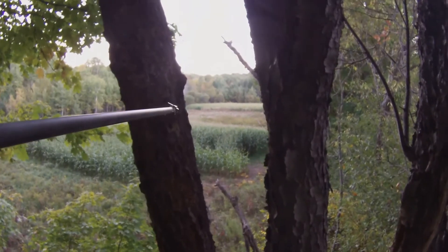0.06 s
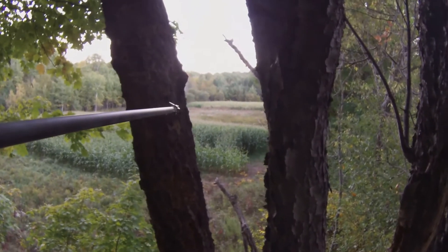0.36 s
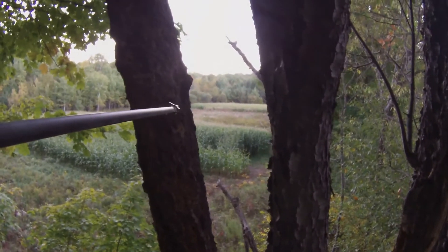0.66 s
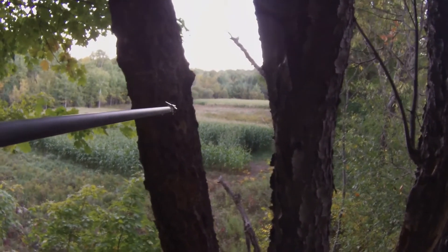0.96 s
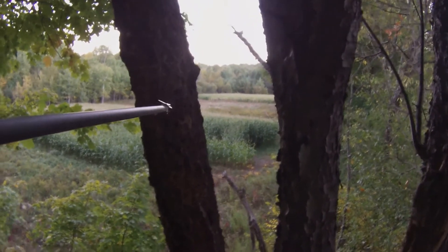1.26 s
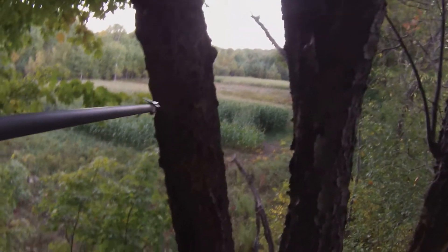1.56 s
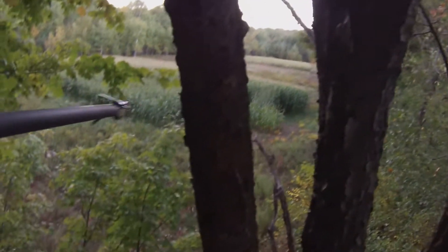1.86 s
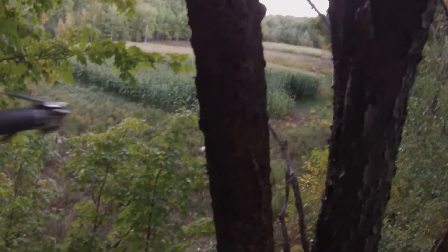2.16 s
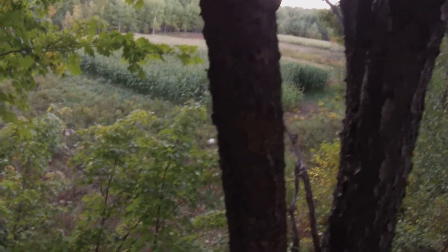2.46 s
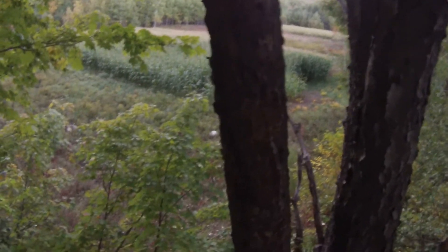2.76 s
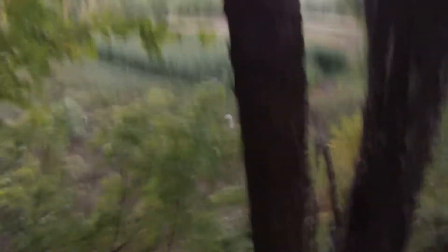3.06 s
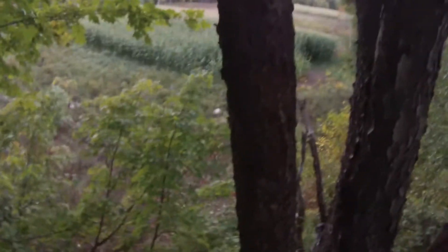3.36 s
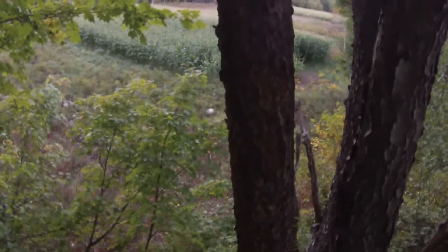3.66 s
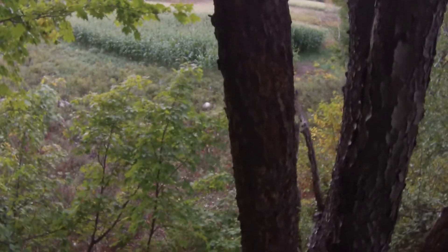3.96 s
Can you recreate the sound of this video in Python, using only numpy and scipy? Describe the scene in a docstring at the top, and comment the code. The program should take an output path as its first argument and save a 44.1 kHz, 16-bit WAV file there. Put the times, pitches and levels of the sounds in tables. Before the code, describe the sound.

One sharp bow shot with a brief rattle, following a quiet draw among trees.

```python
"""A bow is drawn and shot, heard from close by, among trees at the edge of a field.
Sliding friction makes the arrow hiss as it is drawn back. The loosed string drives the damped modes
of the limbs, a thrum, and about 26 ms later strikes its stop with a sharp crack. The frame recoils
and shudders, loose fittings knock, and the trees scatter a faint tail over low handling noise."""
import sys
import numpy as np
from scipy import signal
from scipy.fft import rfft, irfft
from scipy.io import wavfile

SR = 44100
rng = np.random.default_rng(int(sys.argv[2]) if len(sys.argv) > 2 else 0)


def to_wav(s):
    """Save 16-bit WAV."""
    ch = np.atleast_2d(s).T  # columns
    pcm = np.round(np.clip(ch, -1, 1) * 32767)  # PCM
    wavfile.write(sys.argv[1], SR, pcm.astype(np.int16))


N = 176400
TIME = np.arange(N) / SR

# the string runs forward and shakes the limbs: start_s, level_db, brightness_hz, low_cut_hz, chatter_s
RELEASE_HITS = [(2.9784, -34, 13050, 1200, 0.0031), (2.9802, -20, 2433, 653, 0.003),
                (2.9862, -24.5, 1384, 643, 0.0015), (2.9920, -52, 7044, 2200, 0.0023)]
# limb resonances: pitch_hz, gain_db, t60_s
LIMB_MODES = [(610, -15, 0.0436), (849, 3, 0.044), (965, -2.5, 0.033), (1150, 0.5, 0.059), (1316, 2, .05),
              (1868, -7, 0.045), (2494, -12, .006), (3640, -16.5, 0.005), (7000, -26, .008),
              (10870, -6.5, 0.013)]
RELEASE_S = RELEASE_HITS[0][0]

def limb_thrum():
    """Impulse excitation: the loosed string sets the limbs ringing in their damped modes."""
    return strike(RELEASE_HITS, LIMB_MODES, chatter=.4, sign=1)


# the string hits its stop: start_s, level_db, brightness_hz, low_cut_hz, chatter_s
STOP_HITS = [(3.0044, -26.5, 2500, 815, .002), (3.0061, -13, 3300, 816, 0.00081),
             (3.0086, -30.5, 7000, 2600, 0.0014)]
# resonances of the stop and frame: pitch_hz, gain_db, t60_s
STOP_MODES = [(620, -4, .03), (965, 5, .036), (1130, 2.5, .02), (1250, 0, .02), (1370, -1, .02),
              (1680, -2, .02), (1850, -4.5, .022), (2700, -2.5, .018), (2830, -8, .017), (3850, -1.5, .018),
              (4220, -3, .016), (4570, -2.5, .015), (5290, -11, .02), (6200, -13, .011), (7400, -18, .007),
              (11000, -15, .006)]
# faint ring of the metal parts: pitch_hz, level_db, t60_s
METAL_MODES = [(1900, -46, 0.13), (2870, -46, .16), (3780, -48, 0.11), (5330, -43, .11)]

def string_stop():
    """Impact: a brief contact excites a wide band of modes; the lightly damped metal rings longest."""
    crack = strike(STOP_HITS, STOP_MODES, chatter=.3, sign=1)
    hardest_hit_s = STOP_HITS[1][0]
    return crack + ring_out(hardest_hit_s, METAL_MODES)


# the shot jolts the frame, which lurches twice more: start_s, gain_db
JOLTS = [(2.979, 1), (3.121, -14), (3.298, -20)]
# recoil of the whole frame: pitch_hz, level_db, t60_s
RECOIL_MODES = [(27, -40, 0.4), (87, -18.5, 0.1), (164.5, -20.5, 0.085), (320, -36.5, 0.14)]
# slow sway and sinking hum of the frame: pitch_hz, level_db, t60_s
FRAME_MODES = [(11.73, -31.5, 1.6), (75, -45, .6), (132.7, -41.5, 0.47), (189, -47, 0.87)]
# shudder of the frame in the hand: frequency_hz, density_db
SHUDDER_SPECTRUM = [(12, -4), (30, -14), (50, -23.5), (75, -1), (125, -2), (175, -2.5), (240, -13),
                    (450, -24), (800, -27)]

def frame_recoil():
    """Damped free vibration: the frame jumps at each jolt, then hums, shudders and sways to rest."""
    jumps = sum(from_db(db) * ramp(s, rise_s=.013) * ring_out(s, RECOIL_MODES) for s, db in JOLTS)
    hum = ring_out(RELEASE_S, FRAME_MODES, sag_per_s=.45)
    envelope = ramp(RELEASE_S, rise_s=.12) * decay(RELEASE_S, t60_s=.94)
    shudder = from_db(-33) * envelope * noise(SHUDDER_SPECTRUM)
    return jumps + hum + shudder


# contacts of a hard part: start_s, level_db, brightness_hz, low_cut_hz, chatter_s, pitch_ratio
CLACK_HITS = [(3.0610, -29, 5500, 800, 0.0016, 0.98), (3.1042, -34, 1390, 1180, .0008, 0.98),
              (3.1268, -43, 1600, 1300, 0.0018, 1.1), (3.1380, -42, 1500, 1100, 0.0035, 1),
              (3.2200, -54, 1790, 400, .003, 1.08), (3.3030, -53, 1500, 1600, 0.0022, 1.22)]
# its resonances: pitch_hz, gain_db, t60_s
CLACK_MODES = [(956, -2, 0.03), (1550, -12, 0.016), (1770, 5.5, 0.021), (2570, -8, 0.01), (3330, -3, 0.014),
               (4660, -6, 0.014), (6040, -15, 0.008), (7240, -12, 0.008)]

def hard_clacks():
    """Hard contact: a stiffer part rings brightly between the knocks of the fittings."""
    return low_pass(rattle(CLACK_HITS, CLACK_MODES, chatter=.35, sign=1), hz=6600, order=4)


# contacts of loose fittings: start_s, level_db, brightness_hz, low_cut_hz, chatter_s, pitch_ratio
KNOCK_HITS = [(3.031, -39, 3480, 1200, 0.0042, 0.96), (3.0985, -30.5, 1000, 300, 0.0011, 1.01),
              (3.1282, -28.5, 820, 296, 0.0015, 1), (3.1715, -37, 2800, 400, 0.0039, 0.985),
              (3.192, -49.5, 2000, 700, .008, 1.07), (3.257, -55.5, 2000, 1400, 0.0043, 0.97),
              (3.2820, -34, 2050, 298, 0.0013, 1.007), (3.3035, -35.5, 865, 303, 0.003, 0.96),
              (3.3520, -36, 2940, 396, 0.00067, 0.98), (3.3703, -42, 3450, 800, 0.0072, 1.04)]
# their resonances: pitch_hz, gain_db, t60_s
FITTING_MODES = [(407, -15, 0.011), (587, -4.5, 0.067), (806, -0.5, 0.014), (990, 7.5, 0.023),
                 (1123, 1, 0.016), (1700, -8, 0.013), (2170, -19, 0.0036), (3410, -15.5, 0.014),
                 (4700, -24, 0.0085), (7500, -33, .003)]

def fitting_knocks(rebound_s=.00337, rebound_db=-8):
    """Inelastic rebound: every knock of a loose fitting is followed by a softer second touch."""
    knocks = rattle(KNOCK_HITS, FITTING_MODES, chatter=.7)
    rebound_gain = from_db(rebound_db)
    rebounds = rebound_gain * np.interp(TIME - rebound_s, TIME, knocks)
    return (knocks + rebounds) / np.hypot(1, rebound_gain)


# resonances of small parts: pitch_hz, gain_db, t60_s
BUZZ_MODES = [(526, -3, 0.0051), (985, 2.5, 0.016), (1960, -5.5, 0.0075), (4640, -8, 0.0025),
              (7550, -16.5, 0.0005), (11500, -31, 0.0013)]

def parts_buzz():
    """Contact chatter: as the frame shudders, dense tiny impacts of small parts merge into a buzz."""
    buzz = low_pass(resonate(grains(per_s=1900), BUZZ_MODES), hz=8200, order=2)
    return from_db(-41.5) * decay(RELEASE_S, t60_s=.3) * rms_one(buzz)


# friction of the sliding arrow: frequency_hz, density_db
SLIDE_SPECTRUM = [(120, -34.5), (200, 1), (397, -7), (721, -3.5), (1410, -8.5), (1690, -5.5), (2170, -9),
                  (5450, -6), (8720, -15), (11400, -14.5), (15000, -27.5)]
# resonances of the hiss, the low rub and the gritty sizzle: pitch_hz, gain_db, t60_s
HISS_MODES = [(610, 0, .035), (750, 3, 0.06), (1130, 0, 0.005), (1670, 9, .03), (1935, 8, .026),
              (2480, 5, 0.034), (2765, 5.5, .028), (3100, -2, .012), (3800, 2, .011), (4380, -4, .012),
              (5430, 2.5, 0.014), (6090, -2, 0.035), (6890, 1, 0.009), (7500, -6, .005)]
RUB_MODES = [(584, -3, 0.052), (715, 1, 0.023), (1098, -14, 0.018)]
SIZZLE_MODES = [(10900, -3.5, 0.0058), (11600, -3, .004), (13100, -3, .01)]
# their envelopes, the rub swelling near full draw: time_s, level_db
HISS_LEVEL = [(0, -64), (.05, -62), (.12, -73), (.19, -71), (.23, -62.5), (.33, -64.5), (.38, -69.5),
              (.49, -72), (.54, -61.5), (.575, -77), (.65, -67.5), (.71, -60.5), (1.0, -57.5), (1.7, -56.5),
              (2.0, -57.5), (2.35, -59), (2.95, -59), (3.3, -64.5), (4, -72)]
RUB_LEVEL = [(0, -73), (1.4, -79), (1.78, -60), (2.1, -67), (2.3, -67), (2.55, -64), (2.85, -65.5),
             (4, -91.5)]
SIZZLE_LEVEL = [(0, -82), (.7, -87), (.82, -77.5), (1.4, -78.5), (1.75, -71.5), (2.1, -68.5), (2.4, -74.5),
                (2.7, -71.5), (3.0, -82), (4, -87)]

def arrow_slide():
    """Sliding friction: the shaft's scrape drives low and middle resonances, fine grit the highest."""
    friction = noise(SLIDE_SPECTRUM) + .15 * rms_one(low_pass(grains(per_s=900), hz=4500, order=2))
    ringing = sum(flutter(depth_db=3, hz=8) * resonate(friction, [mode]) for mode in HISS_MODES)
    hiss = level(HISS_LEVEL) * rms_one(friction + ringing) * flutter(depth_db=.9, hz=40)
    low_rub = level(RUB_LEVEL) * rms_one(resonate(friction, RUB_MODES))
    grit = grains(per_s=2500)
    sizzle = sum(flutter(depth_db=3, hz=25) * resonate(grit, [mode]) for mode in SIZZLE_MODES)
    return hiss + low_rub + level(SIZZLE_LEVEL) * rms_one(sizzle)


def woodland_echo(shot):
    """Scattering: the nearest trunks return a quick burst, the wood beyond a duller, longer tail."""
    near = rng.standard_normal(N) * decay(.0036, t60_s=.037)
    far = rng.standard_normal(N) * decay(.014, t60_s=.626)
    scatter = from_db(-23.5) * near / np.linalg.norm(near)
    tail = from_db(-31) * low_pass(far / np.linalg.norm(far), hz=3900)
    return signal.fftconvolve(shot, scatter + tail)[:N]


# light contacts: start_s, level_db, brightness_hz, low_cut_hz, chatter_s
TICK_HITS = [(1.0305, -54.5, 7000, 500, 0.00062), (1.1238, -66, 7000, 1500, .0005),
             (3.1755, -60.5, 15000, 5960, 0.0015), (3.376, -64, 9000, 5000, .003)]
# their resonances: pitch_hz, gain_db, t60_s
TICK_MODES = [(1210, 11, 0.0078), (2920, 12, 0.0061), (5000, 5, 0.0025), (7900, -6, 0.0011),
              (13500, -7, 0.00064)]

def dry_ticks():
    """Heavy damping: modes that die within milliseconds are heard as small dry ticks."""
    return strike(TICK_HITS, TICK_MODES, chatter=.3)


# rumble of the hand on the grip: frequency_hz, density_db
HANDLING_SPECTRUM = [(15, -8), (40, 1), (80, -1.5), (135, -0.5), (220, -6), (500, -19), (1000, -40)]
# its envelope: time_s, level_db
HANDLING_LEVEL = [(0, -64), (.25, -64), (.7, -65), (1.2, -64.5), (1.7, -65), (2.0, -60), (2.8, -63.5),
                  (2.95, -59), (3.6, -63), (4, -65.5)]

def hand_on_grip(bump_s=1.715, bump_hz=137, bump_db=-47.5, bump_t60_s=.2):
    """Structure-borne sound: the hand rumbles on the grip and gives it one soft bump."""
    rumble = level(HANDLING_LEVEL) * noise(HANDLING_SPECTRUM)
    return rumble + ring_out(bump_s, [(bump_hz, bump_db, bump_t60_s)])


# still woodland air: frequency_hz, density_db
AIR_SPECTRUM = [(12, -31.5), (20, -3), (43, -19), (249, -19.5), (409, -18.5), (497, -20.5), (571, -20.5),
                (889, -22.5), (1990, -28), (3270, -29.5), (15000, -46)]

def still_air():
    """Stationary noise: a faint, steady background, strongest in the deep bass."""
    return from_db(-62) * noise(AIR_SPECTRUM)


def strike(hits, modes, chatter, sign=-1):
    """Modal impact: a click and dying chatter drive the modes; level_db spreads the energy over 10 ms."""
    out, t = np.zeros(N + SR), TIME[:SR // 5]
    for start_s, level_db, brightness_hz, low_cut_hz, chatter_s in hits:
        force = rng.standard_normal(len(t)) * np.exp(-t / chatter_s)
        force *= chatter / np.linalg.norm(force)
        force[0] += 1  # the click
        ring = resonate(low_pass(force, brightness_hz, order=2), modes, sign)
        ring = signal.sosfilt(signal.butter(2, low_cut_hz, "high", fs=SR, output="sos"), ring)
        start = int(start_s * SR)
        out[start:start + len(t)] += from_db(level_db) * ring / np.linalg.norm(ring) * np.sqrt(SR / 100)
    return out[:N]


def rattle(hits, modes, chatter, sign=-1):
    """Repeated impact: a loose part rings at a pitch of its own each time, set by where it lands."""
    out = 0
    for *hit, pitch_ratio in hits:
        shifted_modes = [(hz * pitch_ratio, db, t60_s) for hz, db, t60_s in modes]
        out = out + strike([hit], shifted_modes, chatter, sign)
    return out


def resonate(force, modes, sign=-1):
    """Forced response of parallel resonators; with sign=-1 neighbours alternate in polarity."""
    out = 0
    for k, (hz, peak_db, t60_s) in enumerate(modes):
        radius = np.exp(-np.log(1000) / (t60_s * SR))
        poles = [1, -2 * radius * np.cos(2 * np.pi * hz / SR), radius ** 2]
        gain = sign ** k * from_db(peak_db) * (1 - radius ** 2) / 2
        out = out + gain * signal.lfilter([1, 0, -1], poles, force + 1e-18)
    return out


def ring_out(start_s, modes, sag_per_s=0):
    """Free decay of modes started together; their pitch may sink by a fraction per second."""
    age = TIME - start_s
    phase_per_hz = 2 * np.pi * (age - sag_per_s * age ** 2 / 2)
    return sum(from_db(db) * decay(start_s, t60_s) * np.sin(hz * phase_per_hz) for hz, db, t60_s in modes)


def noise(spectrum):
    """Spectral shaping: noise of unit rms that rolls off beyond both ends of the given spectrum."""
    hz, db = np.transpose(spectrum)
    bin_hz = np.maximum(np.fft.rfftfreq(N, 1 / SR), 1)
    gain = from_db(np.interp(np.log(bin_hz), np.log(hz), db))
    roll_off = np.minimum(bin_hz / hz[0], 1) * np.minimum(hz[-1] / bin_hz, 1) ** 2
    return rms_one(irfft(rfft(rng.standard_normal(N)) * gain * roll_off, N))


def grains(per_s):
    """Shot noise: clicks of random time and size."""
    return (rng.random(N) < per_s / SR) * rng.standard_normal(N)


def flutter(depth_db, hz):
    """Random amplitude modulation: a gain that wanders."""
    return from_db(depth_db * rms_one(low_pass(rng.standard_normal(N), hz, order=2)))


def decay(start_s, t60_s):
    """Exponential decay from a jump to 1."""
    return (TIME >= start_s) * from_db(-60 * np.maximum(TIME - start_s, 0) / t60_s)


def ramp(start_s, rise_s):
    """Linear attack from 0 to 1."""
    return np.clip((TIME - start_s) / rise_s, 0, 1)


def level(points):
    """Gain envelope interpolated in decibels."""
    return from_db(np.interp(TIME, *np.transpose(points)))


def low_pass(x, hz, order=1):
    """Treble roll-off of 6 dB per octave for each order."""
    return signal.sosfilt(signal.butter(order, np.clip(hz, 10, .45 * SR), fs=SR, output="sos"), x)


def rms_one(x):
    """Normalisation to unit rms."""
    return x / np.sqrt(np.mean(x ** 2) + 1e-20)


def from_db(db):
    """Decibels to amplitude ratio."""
    return 10 ** (np.asarray(db) / 20)


def scene():
    """Superposition: the shot, its echo, the draw and the recoil add to the background in one channel."""
    shot = limb_thrum() + string_stop() + hard_clacks() + fitting_knocks() + parts_buzz()
    shot = low_pass(shot, hz=11500, order=3)
    handling = hand_on_grip() + dry_ticks()
    return (shot + arrow_slide() + woodland_echo(shot) + frame_recoil() + handling + still_air())[None]


CEILING, CUTOFF_HZ = .85, 15300

def record(dry):
    """Soft saturation rounds the highest peaks; a steep low-pass limits the bandwidth."""
    rounded = dry / (1 + (dry / CEILING) ** 4) ** .25
    return signal.sosfilt(signal.ellip(10, .1, 70, CUTOFF_HZ, fs=SR, output="sos"), rounded)


dry = scene()
out = record(dry)
to_wav(out)
```